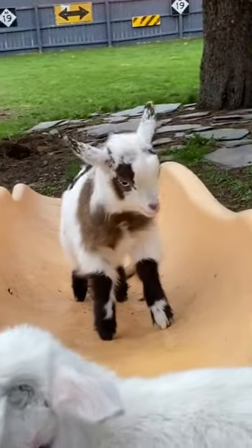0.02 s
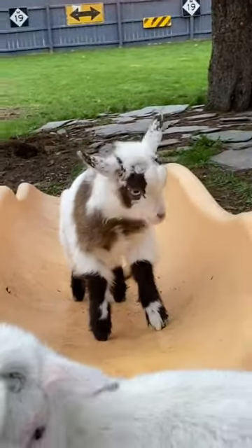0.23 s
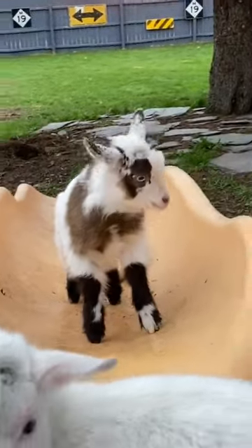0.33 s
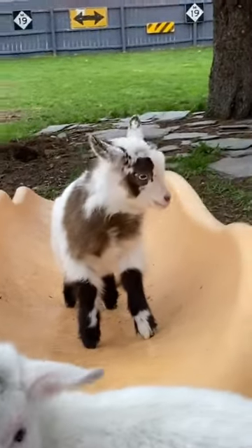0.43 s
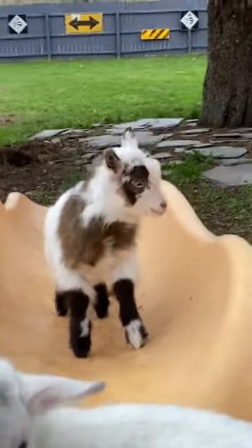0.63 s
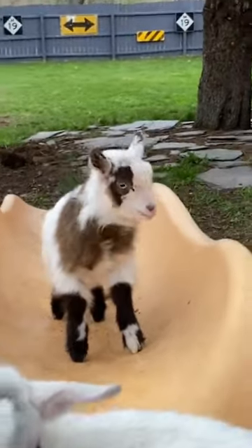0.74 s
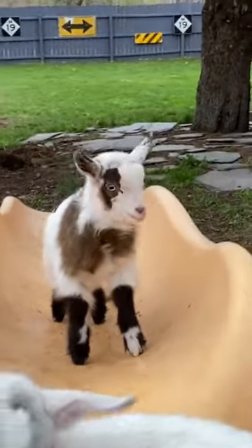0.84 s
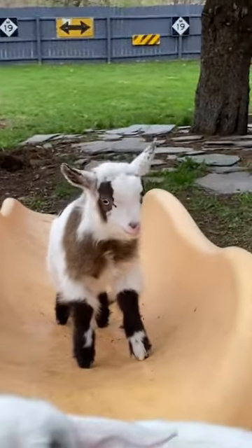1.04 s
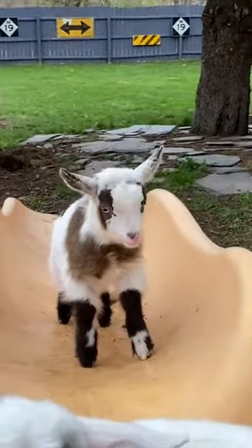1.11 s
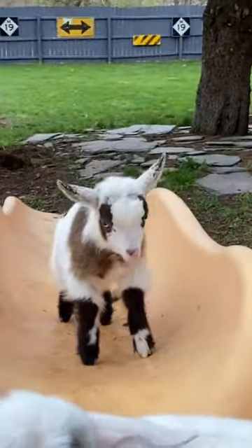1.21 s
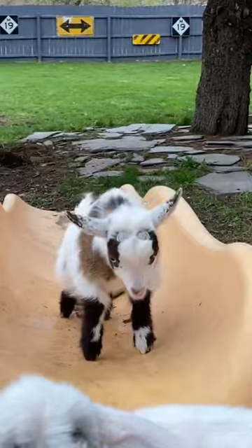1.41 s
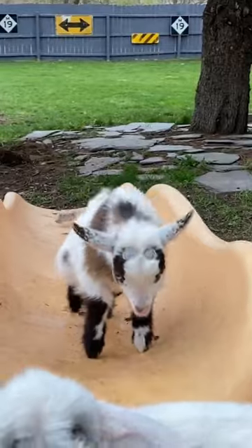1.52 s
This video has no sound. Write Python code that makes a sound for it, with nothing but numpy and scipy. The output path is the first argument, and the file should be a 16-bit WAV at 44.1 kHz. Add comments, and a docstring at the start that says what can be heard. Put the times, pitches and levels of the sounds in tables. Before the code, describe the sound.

A rapid burst of sharp hoof knocks booms on hollow plastic in a quiet garden

```python
"""Goat on a plastic slide

A young goat stamps five times on a hollow plastic slide in a garden, a metre or two from a two-port microphone.
Each blow layers a horny crack (noise and a snap into short modes), a boom of ringing shell modes with the bass
arriving last, and a gritty shudder of banded noise. Light ticks, a thin scrape and soft taps fill in around them.
Outdoor rumble and leaf noise lie underneath; near the end an animal close by snuffles in puffs of shaped hiss.
"""
import sys
import numpy as np
from scipy import signal
from scipy.fft import rfft, irfft, next_fast_len
from scipy.io import wavfile

SR = 44100
rng = np.random.default_rng(int(sys.argv[2]) if len(sys.argv) > 2 else 0)


def persist_wave(psi):
    """Save psi, clipped to +-1, as 16-bit WAV."""
    counts = np.round(np.clip(psi, -1, 1) * 32767).astype(np.int16)
    wavfile.write(sys.argv[1], SR, np.atleast_2d(counts).T)


def level_to_linear(level):
    """Convert decibel levels to linear amplitude factors, elementwise."""
    exponent = np.asarray(level, float) / 20
    return 10 ** exponent


N = 70560

# Hoof blows; all levels relative: t/s, crack level/dB, crack pitch f/Hz, boom level/dB, hollow band level/dB
HOOF_BLOWS = [(.211, -8.5, 3050, -11, -2), (.392, -6, 3000, -11.5, -1.5), (.540, -6, 2600, -13, 0.5),
              (0.6801, -11, 2568, -15, 8.5), (.818, -9, 4010, -19, -11)]
# Light ticks as the hoof settles: t/s, relative level/dB
SETTLING_TICKS = [(.272, -41), (.457, -42), (.608, -41)]
# Short modes under the hoof: f/Hz, relative level/dB
HOOF_MODES = [(2330, 3), (2640, -1), (2970, -0.5), (3320, -3.5), (3780, -4), (5200, -8), (5900, -7),
              (6600, -5.5)]
# Shell modes of the slide: f/Hz, relative level/dB, t60/s, first swing (+1 outward, -1 inward)
SHELL_MODES = [(48, -6, .33, 1), (60, -2, .33, -1), (97, -7, .27, -1), (114, -6, .32, -1), (140, -4, .3, 1),
               (130, 3, .05, 1), (194, -4, .07, -1), (285, -11, .18, -1), (318, -2, .11, -1),
               (392, -2, .13, 1), (445, -5, .1, -1), (480, 1, .06, 1), (605, -9, .09, 1),
               (770, -2, .065, 1), (900, -10, .1, -1), (1025, -4, .08, -1), (1500, -10, .08, 1),
               (1635, -11, .09, -1)]
# Spectrum of the gritty shudder: f/Hz, relative level/dB per Hz
GRIT_SPECTRUM = [(150, -13), (250, -7.5), (500, -9), (900, -15), (1260, -17.5), (2000, -18.5),
                 (6640, -38.5), (9000, -37), (16000, -105.5)]
# Decay of the shudder: f/Hz, t60/s
GRIT_DECAY = [(250, 0.27), (900, 0.18), (2400, 0.12), (6400, 0.12), (12000, 0.11)]
# Snuffling breath over time: t/s, level/dB
SNUFFLE_LEVEL = [(1.0, -108), (1.03, -83.5), (1.092, -101), (1.216, -86.5), (1.26, -70.5), (1.392, -83),
                 (1.404, -57.5), (1.454, -61.5), (1.47, -76), (1.556, -59), (1.574, -51.5), (1.6, -56)]
# Spectrum of the broad nostril hiss: f/Hz, relative level/dB per Hz
NOSTRIL_SPECTRUM = [(2400, -54), (3000, -14), (12000, -26), (16000, -21.5)]
# Faint soft taps nearby: t/s, relative level/dB, f/Hz
SOFT_TAPS = [(1.387, -63, 1613), (1.412, -62.5, 1460), (1.452, -58.5, 877), (1.565, -56.5, 650)]
# Spectrum of the outdoor air: f/Hz, relative level/dB per Hz
AIR_SPECTRUM = [(15, -56), (25, -23.5), (76, 3), (180, -13.5), (285, -14.5), (400, -20), (620, -15.5),
                (1150, -20), (1580, -18), (2160, -28), (6740, -45.5), (16000, -103)]
# Swell of the outdoor air: t/s, relative level/dB
AIR_SWELL = [(0.0, -57.5), (0.248, -59.5), (0.396, -48.5), (0.618, -58), (0.882, -56.5), (1.3, -55),
             (1.6, -50.5)]
# Likeness of the two ports in banded noise: f/Hz, left-right correlation
PORT_LIKENESS = [(60, 0.95), (110, 0.77), (200, 0.71), (380, 0.33), (1300, 0.096), (12000, 0.088)]
# Left port against the right, for sound from the slide: f/Hz, level/dB, phase beyond the lag/rad
LEFT_PORT_COLOUR = [(57, -5, 0.5), (167, -5.5, -0.8), (325, -6.5, -1.32), (930, -8, -1.17), (1366, -0.5, 0),
                    (2060, -3, 1.36), (2537, -9.5, -0.11), (5070, 9.5, -1), (5820, 5.5, -1),
                    (6780, -3.5, -1.4), (7830, -9.5, -2.5), (9240, 1, -0.44), (14000, 9, 0.5)]


def rms_one(x):
    """Scales a sound to an rms of 1."""
    return x / np.sqrt(np.mean(x ** 2) + 1e-20)


def in_time(rows):
    """Draws a level curve in dB through (time, level) points."""
    s, db = np.transpose(rows)
    return np.interp(np.arange(N) / SR, s, db)


def at_hz(points, hz):
    """Reads a curve at a frequency, straight between points on a log pitch scale."""
    points = np.array(points)
    return np.interp(np.log(hz), np.log(points[:, 0]), points[:, 1])


def drift(rate_hz):
    """Slow random wander of rms 1: noise through two equal low-pass poles, made at a fortieth of SR."""
    r = np.exp(-80 * np.pi * rate_hz / SR)
    noise = rng.standard_normal(N // 40 + 2002)
    slow = signal.lfilter([1], [1, -2 * r, r * r], noise)[2000:]  # start-up dropped
    return np.interp(np.arange(N) / 40, np.arange(len(slow)), rms_one(slow))


def clicks(s, gain):
    """Single-sample impulses at given times, over a floor far below hearing."""
    out = np.full(N, 1e-18)
    place = (np.asarray(s) * SR).astype(int)
    out[np.clip(place, 0, N - 1)] = gain
    return out


def ring(x, hz, t60):
    """A two-pole resonator: a unit click sets off a dying sine of starting height about 1."""
    r = level_to_linear(-60 / (t60 * SR))
    w = 2 * np.pi * hz / SR
    return signal.lfilter([0, np.sin(w)], [1, -2 * r * np.cos(w), r * r], x)


def fade(x, t60):
    """A click becomes an exponentially dying envelope."""
    return signal.lfilter([1], [1, -level_to_linear(-60 / (t60 * SR))], x)


def bandpass(x, order, edges_hz):
    """Keeps the sound between two pitches."""
    return signal.sosfilt(signal.butter(order, edges_hz, "band", fs=SR, output="sos"), x)


def bands(spectrum, shape):
    """Stereo noise in bands of about a third octave; shape(hz) gives each band its envelope."""
    edges = 25 * 2 ** np.arange(0, 9.4, .33)
    centres = np.sqrt(edges[1:] * edges[:-1])
    total = np.sqrt(np.sum(level_to_linear(at_hz(spectrum, centres)) ** 2 * np.diff(edges)))
    white = rng.standard_normal((2, 2, N + 8000))
    out = 0
    for k, hz in enumerate(centres):
        if spectrum[0][0] < hz < spectrum[-1][0]:
            # neighbouring bands use different noise; the filter's start-up is dropped
            noise = bandpass(white[k % 2], 2, edges[k:k + 2])[:, 8000:]
            mid, side = noise * np.sqrt(SR / 2)
            alike = np.clip(at_hz(PORT_LIKENESS, hz), -1, 1)
            pair = np.sqrt(1 + alike) * mid + np.sqrt(1 - alike) * side * [[1], [-1]]
            out = out + level_to_linear(at_hz(spectrum, hz)) / total * shape(hz) * pair
    return out


def ports(x):
    """One sound at both ports: the left hears it later and coloured by the microphone's body."""
    lag_s = .00027
    table, size = np.array(LEFT_PORT_COLOUR), next_fast_len(N + 2000)
    hz = np.arange(size // 2 + 1) * SR / size + 1e-9
    # the extra phase shrinks to nothing below the lowest point
    extra_phase = at_hz(table[:, ::2], hz) * np.minimum(hz / table[0, 0], 1)
    phase = extra_phase - 2 * np.pi * hz * lag_s
    left = irfft(rfft(x, size) * level_to_linear(at_hz(table, hz)) * np.exp(1j * phase), size)[:N]
    return np.array([left, x])


def boom():
    """Every blow drives all modes of the shell, each in its own sense; low bending waves arrive last."""
    shell_db, spread_db = 1.12, 2.2
    # a band that depends on where the hoof lands; its rival loses half of what it gains, in dB
    hollow_hz, rival_hz, hollow_octaves = 470, 320, .15
    lag_100hz_s = .004  # falls with the root of pitch
    swell_cycles = .5  # time constant of the build-up, in cycles of the mode
    s, _, _, db, hollow_db = np.transpose(HOOF_BLOWS)
    chance = rng.standard_normal((len(s), len(SHELL_MODES)))
    out = 0
    for k, (hz, level_db, t60, sense) in enumerate(SHELL_MODES):
        octaves = np.log2(hz / np.array([hollow_hz, rival_hz]))
        nearness = np.exp(-(octaves / hollow_octaves) ** 2)
        place_db = hollow_db * (nearness @ [1, -.5])
        gain = level_to_linear(shell_db + db + level_db + place_db + spread_db * chance[:, k])
        # make up for what the build-up takes away at the mode's pitch
        gain = gain * np.hypot(1, 2 * np.pi * swell_cycles)
        push = clicks(s + lag_100hz_s * np.sqrt(100 / hz), gain)
        r = np.exp(-hz / (swell_cycles * SR))
        swelling_push = signal.lfilter([1 - r], [1, -r], push)
        out = out + ring(swelling_push, hz, t60) * np.sign(sense)
    return ports(out)


def cracks():
    """Horn on plastic: a snap and a few milliseconds of noise into short modes, after a faint rise of noise."""
    crack_db, bass_db = 18.5, -16  # bass_db: share of the bare contact noise
    snap, contact, touch_t60_s = 4.36, 0.44, 0.0059
    rise_s, rise_db = 0.0095, -19.5  # faint noise swelling just before the crack
    toe_s, toe_db, toe_t60_s = 0.0024, -29, 0.0092  # the toe tip touches first
    mode_t60_s, focus_db, focus_octaves = .009, 7.5, 0.18  # modes near the crack pitch are favoured
    low_hz, top_hz = 1900, 7780
    grain = rng.standard_normal((2, N))
    hits = [row[:3] for row in HOOF_BLOWS] + [(s, db, 2900) for s, db in SETTLING_TICKS]
    out = 0
    for s, db, pitch_hz in hits:
        until = s - np.arange(N) / SR
        landing = fade(clicks([s], contact), touch_t60_s)
        rise = level_to_linear(rise_db) * np.exp(-3 * np.abs(until) / rise_s) * (until > 0)
        toe = fade(clicks([s - toe_s], level_to_linear(toe_db)), toe_t60_s)
        envelope = landing + rise + toe
        force = envelope * grain[0] + clicks([s], snap)
        rung = 0
        for k, (mode_hz, mode_db) in enumerate(HOOF_MODES):
            nearness = np.exp(-(np.log2(mode_hz / pitch_hz) / focus_octaves) ** 2)
            mode_gain = (-1) ** k * level_to_linear(mode_db + focus_db * nearness)
            rung = rung + ring(force, mode_hz, mode_t60_s) * mode_gain
        out = out + level_to_linear(db + crack_db) * (0.015 * rung + level_to_linear(bass_db) * envelope * grain[1])
    return ports(bandpass(out, 5, [low_hz, top_hz]))


def shudder():
    """The shell and the grit on it rattle on, each band dying at its own rate; part reaches both ports alike."""
    grit_db, rise_s = -8, .002  # grit_db is set against the boom
    burst_db, burst_t60_s = 11.5, 0.015  # extra burst at the start
    linger_db, linger_t60_s = -23.5, 0.39  # faint scatter from fence and trees
    shared = .7
    s, _, _, db, _ = np.transpose(HOOF_BLOWS)
    r = np.exp(-1 / (rise_s * SR))
    hits = signal.lfilter([1 - r], [1, -r], clicks(s, level_to_linear(db + grit_db)))
    burst = level_to_linear(burst_db) * fade(hits, burst_t60_s)
    linger = level_to_linear(linger_db) * fade(hits, linger_t60_s)
    rattle_db = 1.2 * drift(82)  # common to all bands

    def band_envelope(hz):
        """Body, burst and scatter of one band, with a wander of its own."""
        body = fade(hits, at_hz(GRIT_DECAY, hz))
        return (body + burst + linger) * level_to_linear(rattle_db + 1.2 * drift(42))

    left, right = bands(GRIT_SPECTRUM, band_envelope)
    own = level_to_linear(-3.0) * np.sqrt(1 - shared ** 2) * left
    return np.array([shared * ports(right)[0] + own, right])


def scrape():
    """The last hoof slips: a brief thin band of noise under a rounded swell."""
    start_s, length_s, level_db, pitch_hz = 0.854, 0.038, -55, 5470  # level before the swell
    place = (np.arange(N) / SR - start_s) / length_s
    swell = np.sqrt(np.sin(np.pi * np.clip(place, 0, 1)) + 1e-12)
    hiss = rms_one(bandpass(rng.standard_normal(N), 2, [pitch_hz * 0.85, pitch_hz * 1.6]))
    return ports(level_to_linear(level_db) * hiss * swell)


def snuffle():
    """Puffs of air through an animal's nostrils: a high whistling band over broad hiss."""
    whistle_hz, width_hz, broad_db = 10430, 1440, -8.5
    puff = level_to_linear(in_time(SNUFFLE_LEVEL))
    edges = whistle_hz + width_hz / 2 * np.array([-1, 1])
    whistle = rms_one(bandpass(rng.standard_normal((2, N)), 3, edges))
    hiss = bands(NOSTRIL_SPECTRUM, lambda hz: puff * level_to_linear(broad_db + 4.3 * drift(38)))
    return puff * whistle + hiss


def taps():
    """Small dull contacts: dying noise excites one short resonance each, alike at both ports."""
    out = 0
    for s, db, hz in SOFT_TAPS:
        contact = fade(clicks([s], level_to_linear(db)), 0.027) * rng.standard_normal(N)
        out = out + ring(contact, hz, 0.026)
    return np.array([out, out])


def air():
    """Far traffic and wind in leaves as banded noise; the rumble follows the swell only in part."""
    air_db, rumble_follows, rumble_hz = 7, 0.76, 185.2
    level_db = in_time(AIR_SWELL)
    mean_db = level_db.mean()
    swing_db = level_db - mean_db
    together_db = 0.49 * drift(26)  # wander common to all bands

    def band_envelope(hz):
        """Swell of one band, with a wander of its own."""
        follows = rumble_follows if hz < rumble_hz else 1
        return level_to_linear(air_db + mean_db + swing_db * follows + together_db + 1.6 * drift(7))

    return bands(AIR_SPECTRUM, band_envelope)


def scene():
    """Sums all sources at the two ports."""
    return boom() + cracks() + shudder() + scrape() + snuffle() + taps() + air()


def low_pass(x):
    """Removes everything above the highest recorded frequency."""
    return signal.sosfilt(signal.butter(12, 16970, fs=SR, output="sos"), x)


def record(dry):
    """The microphone drops the deepest bass; peaks are rounded off below a ceiling."""
    low_hz, ceiling = 30, 0.7
    x = signal.sosfilt(signal.butter(2, low_hz, "high", fs=SR, output="sos"), dry)
    held = x / (1 + np.abs(x / ceiling) ** 6) ** (1 / 6)
    return low_pass(held)


dry = scene()
out = record(dry)
persist_wave(out)
```